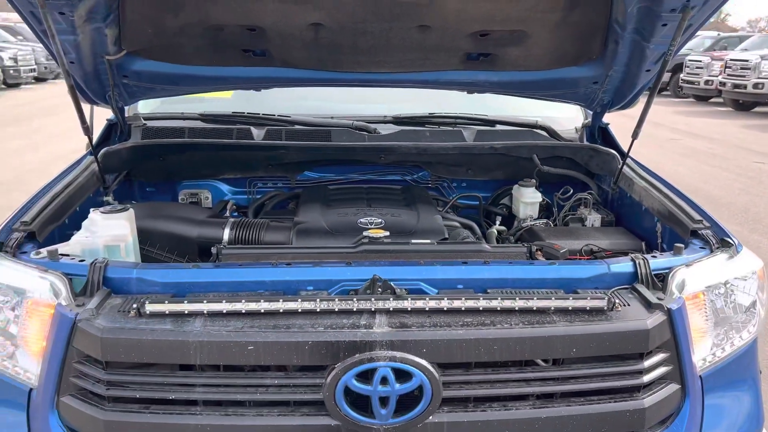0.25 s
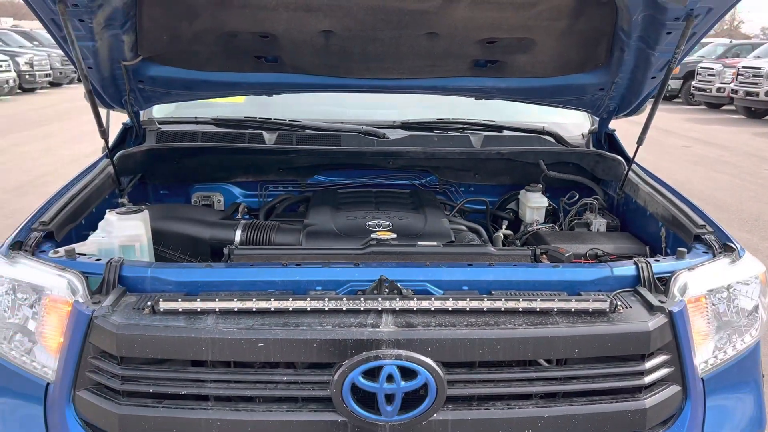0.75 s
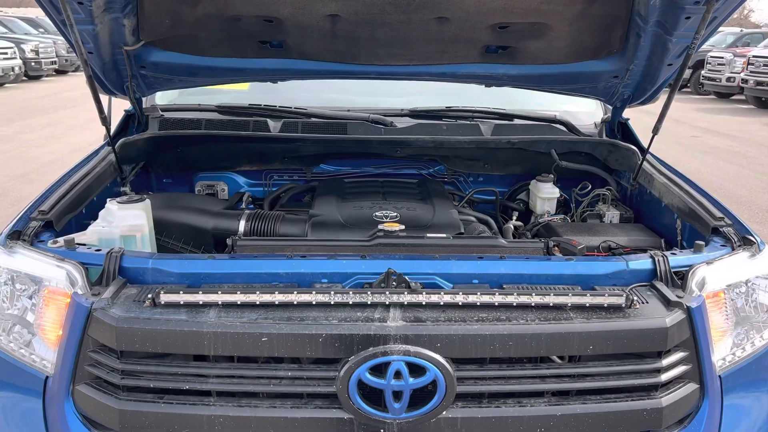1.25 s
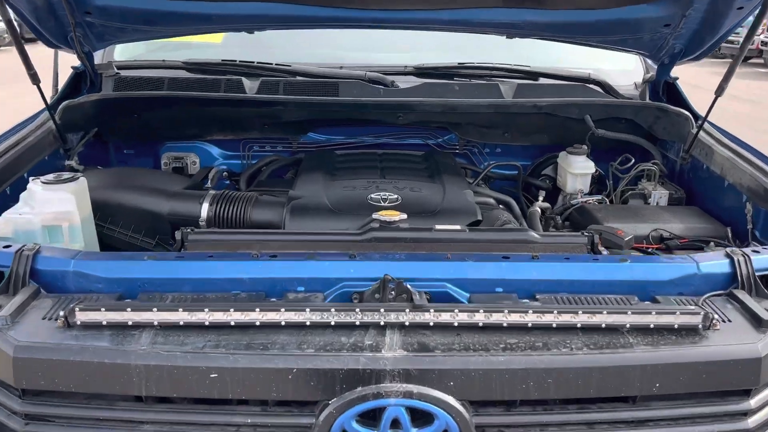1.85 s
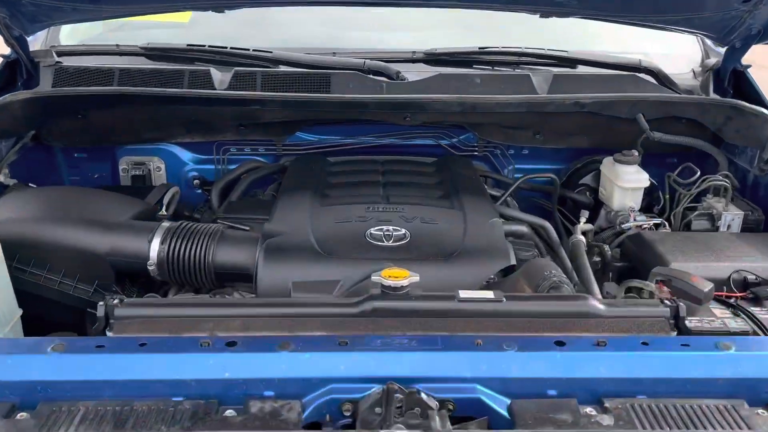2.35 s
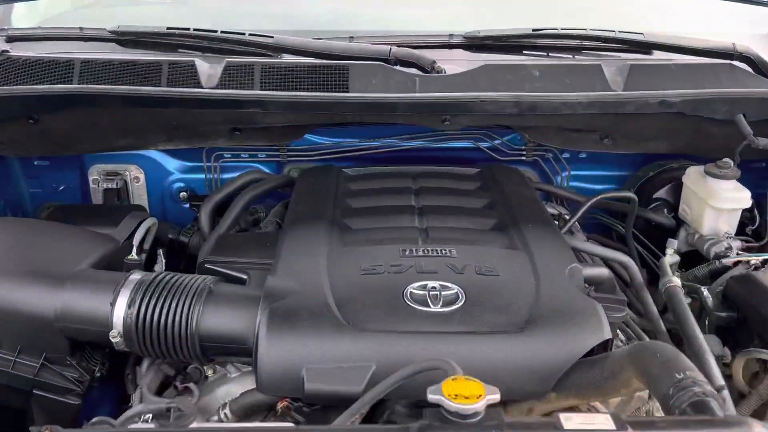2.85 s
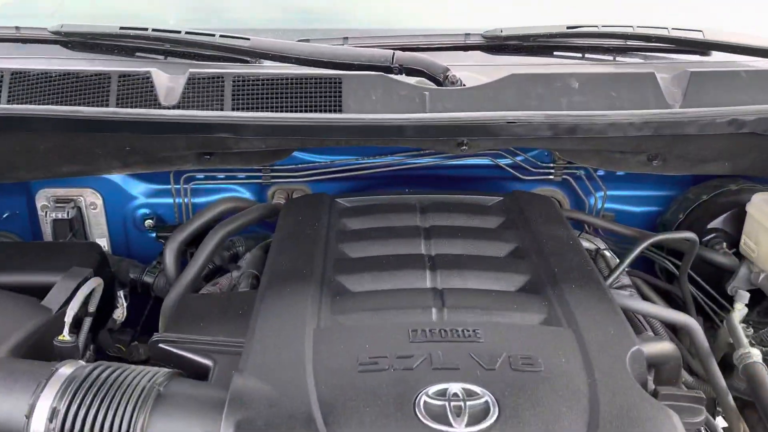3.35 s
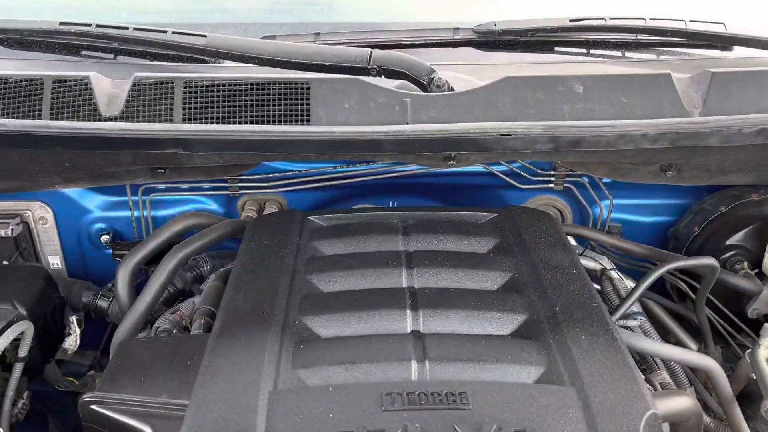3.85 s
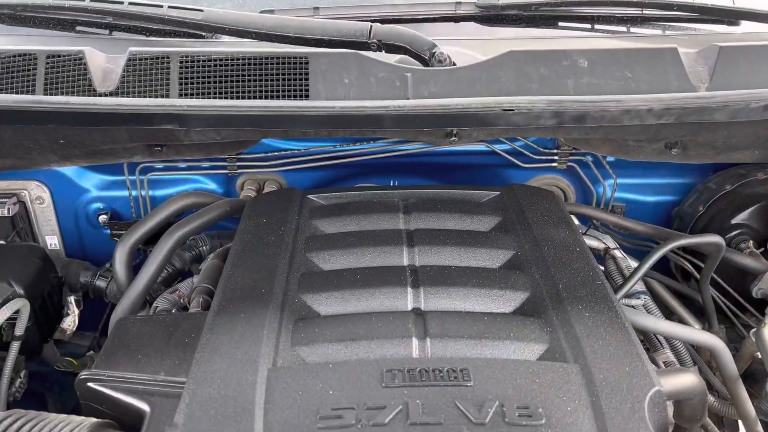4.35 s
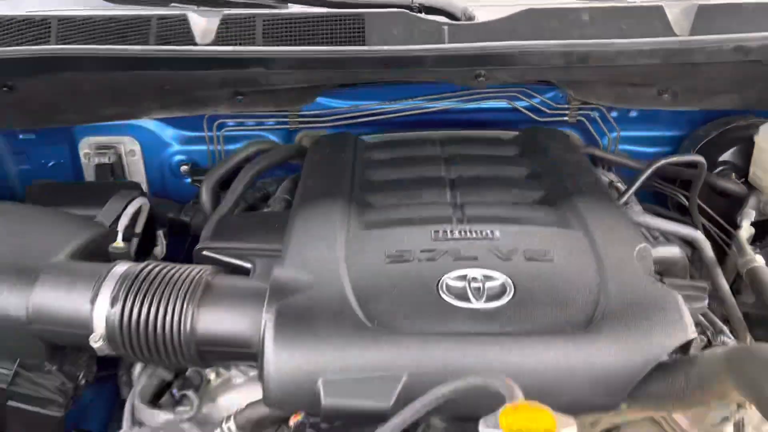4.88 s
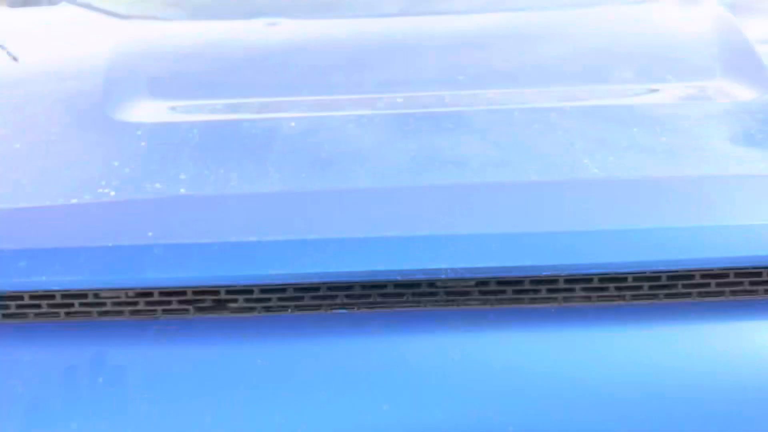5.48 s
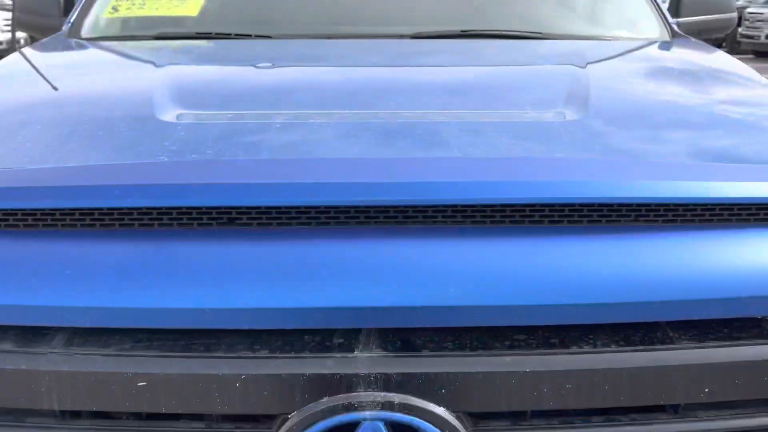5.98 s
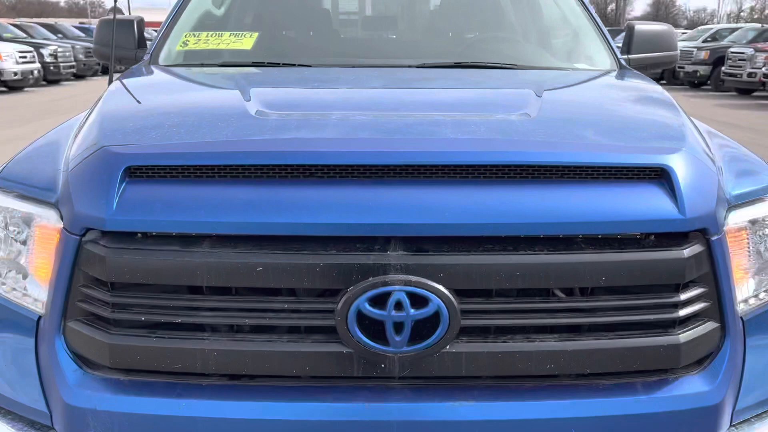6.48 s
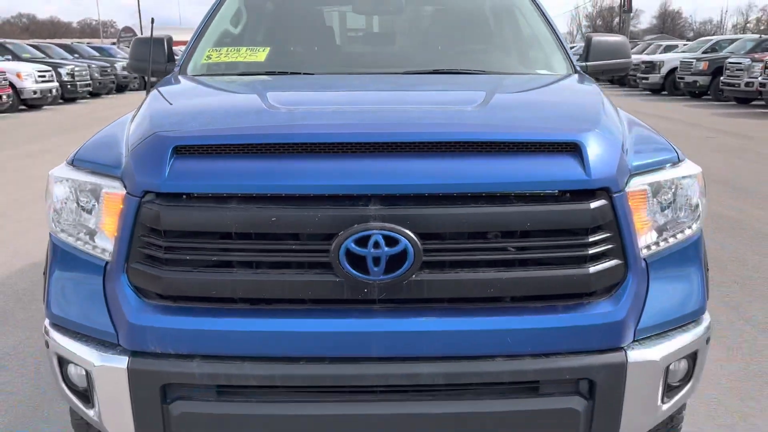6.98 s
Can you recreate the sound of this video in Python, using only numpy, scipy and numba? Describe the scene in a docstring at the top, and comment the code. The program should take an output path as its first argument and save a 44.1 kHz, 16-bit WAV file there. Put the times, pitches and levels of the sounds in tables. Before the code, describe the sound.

Outdoors, a pickup engine idles and hisses closer through thumping wind until its metal hood bangs down, leaving a duller roar and hard gusts.

```python
"""A pickup idles with its hood up on a windy outdoor lot; a hand-held stereo microphone moves in over the engine.
Engine: band-filtered noise roars, and valve hiss throbs at the firing rate. Wind: noise at three eddy sizes,
with short sagging pulses, buffets the ports throughout. After about five seconds the hood slams shut: noise and
decaying modes make its blows. The engine is then muffled, and the gain control ducks under the slam and
recovers; amid the last gusts a few ticks of cooling metal are short noise decays."""
import sys
import numpy as np
from scipy import signal
from scipy.fft import rfft, irfft, next_fast_len
from scipy.io import wavfile
from scipy.ndimage import uniform_filter1d
from numba import njit

SR = 44100
rng = np.random.default_rng(int(sys.argv[2]) if len(sys.argv) > 2 else 0)


def wrap_up_sound(samples):
    """Save the sound to the file named by the first command line argument, as 16-bit audio."""
    columns = np.atleast_2d(samples).T
    # keep every value between -1 and 1, then stretch to whole-number steps
    tamed = np.clip(columns, -1, 1)
    steps = np.round(tamed * 32767).astype(np.int16)
    wavfile.write(sys.argv[1], SR, steps)


N = 318666
LEFT_RIGHT = np.array([[1], [-1]])  # opposite signs for the two ports

# spectrum of the crack of struck metal: f/Hz, relative level/dB
CRACK_SPECTRUM = [(1500, 10.5), (3000, 5.5), (4500, 11), (6000, 4.5), (8500, 8), (10500, -4), (12500, 4),
                  (15500, -5), (16500, -21)]


def engine():
    """Amplitude modulation: airflow noise flutters band by band, valve noise throbs with the firing cycle."""
    # source levels, hood up then hood shut: t/s, fan and intake roar level/dB, valve gear hiss level/dB
    engine_levels = [
        [(0, -37.5, -50), (1, -36, -49.5), (1.8, -36, -48.5), (2.4, -37, -46), (2.9, -35, -43.5),
         (3.4, -35, -40.5), (4.2, -35, -40.5), (4.9, -34.5, -40.5), (5.05, -34.5, -41.5), (5.19, -37.5, -53.5)],
        [(5.3, -47.5, -60), (5.4, -41, -58), (5.5, -38, -58), (5.56, -35, -59), (5.62, -35.5, -58),
         (6.0, -33.5, -52.5), (6.35, -34.5, -53.5), (6.8, -35, -57), (7.226, -34.5, -56)],
    ]
    roar_db, valve_db = curve(engine_levels[0] + engine_levels[1])
    roar_gain = undb(roar_db + 0.13 * walk(5.8))
    return roar_gain * intake_roar() + valve_hiss(valve_db)


def intake_roar():
    """Broadband flow noise of fan and intake; shutting the hood alters its spectral envelope."""
    # roar with the hood up: f/Hz, relative level/dB
    open_spectrum = [(150, 8), (400, -8.5), (800, 3.5), (1050, 3.5), (1500, 2.5), (2000, 0), (2500, -4),
                     (2900, -6.5), (3200, -12), (4200, -17), (6000, -28)]
    # roar with the hood shut: f/Hz, relative level/dB
    shut_spectrum = [(150, 12.5), (400, 0), (800, 3), (1100, 2), (1500, -1.5), (2000, -1.5), (2400, 0),
                     (2750, -6.5), (3000, -13.5), (4200, -16), (5500, -22), (7000, -29)]
    shut = np.arange(N) / SR > 5.25
    muffled = ports(noise(shut_spectrum), noise(shut_spectrum), -0.21)
    exposed = ports(noise(open_spectrum), noise(open_spectrum), -0.72)
    roar = np.where(shut, muffled, exposed)
    # the air stream flutters on its own in each of eight bands, split by differences of low-passes
    cutoffs_hz = (700, 1000, 1350, 1750, 2200, 2650, 3200)
    lows = [signal.sosfilt(signal.butter(2, hz, fs=SR, output="sos"), roar) for hz in cutoffs_hz]
    bands = np.diff([0 * roar, *lows, roar], axis=0)
    fluttering = np.zeros((2, N))
    for band in bands:
        flutter_db = 2.85 * walk(70) + 2.5 * walk(30) + 1.7 * walk(14) + 0.74 * walk(6.3)
        fluttering += undb(flutter_db) * band
    return fluttering


def valve_hiss(valve_db):
    """Periodic amplitude modulation: hiss leaps at each firing of the eight cylinders and decays between."""
    # valve gear hiss: f/Hz, relative level/dB
    valve_spectrum = [(2500, 6), (3500, -0.5), (5000, 0.5), (6500, 1.5), (8500, -1.5), (10200, -7.5),
                      (12000, 0.5), (14000, -15.5), (15600, 2), (16100, -35)]
    firing_hz = 46.3  # mean rate
    cycles = np.cumsum(firing_hz * (1 + .004 * walk(3))) / SR
    throb_db = 5.5 * np.exp(-(cycles % 1) / .4) - 2.2
    throb_db = throb_db + 1.5 * walk(60) + 1.1 * walk(12)
    hiss = ports(noise(valve_spectrum), noise(valve_spectrum), -58.0)
    return undb(valve_db + throb_db + .7 * LEFT_RIGHT) * hiss


def slam():
    """Impact excitation: successive blows drive panel modes, steel latch modes and a faster-dying crack."""
    # blows of hood on latch and stops: t/s, level/dB, bass weight/dB, treble level re blow/dB,
    # nominal t60/s of the panel rattle (the crack's shorter decay is scaled from it), latch ring level re blow/dB
    blows = [(5.199, -26, -9, -11, 0.12, -16), (5.206, -14.5, -17, -18, 0.13, -14),
             (5.2124, -10.5, -19, -0.5, 0.057, 4.5), (5.2155, -13, -21, 1.5, 0.032, -4),
             (5.219, -24, -15, -9, 0.074, -12), (5.2257, -11.5, -12, -4.5, 0.12, -6),
             (5.2293, -14.5, -17, 3, 0.12, 3), (5.2364, -0.5, -6, -9, 0.09, -17),
             (5.2405, -7, -1, -7, 0.065, -13), (5.2482, -1, -5, -14, 0.11, -17),
             (5.257, -6, -12, -17, 0.1, -17), (5.266, -1, -3.5, -12, 0.14, -18),
             (5.275, -4, -5, -10, 0.08, -14), (5.283, -2.5, -4.5, -13, 0.14, -17),
             (5.292, 0.5, -5, -13, 0.15, -16), (5.298, 0.5, -4.5, -16, 0.16, -19),
             (5.308, -8, 1, -18, 0.099, -24), (5.325, -13, 3, -26, 0.12, -30),
             (5.343, -6.5, -0.5, -31, 0.14, -37), (5.376, -15, 0, -21, 0.08, -24),
             (5.43, -37, 5, -7, 0.015, -15)]
    t = np.arange(int(.3 * SR)) / SR
    out = np.zeros((2, N))
    for s, db, weight_db, treble_db, rattle_t60, latch_db in blows:
        boom = undb([[-1.2], [1.2]]) * panel(t, weight_db, rattle_t60)  # stronger on the right
        add(out, s, undb(db) * (boom + crack(t, treble_db, rattle_t60) + latch(t, latch_db)))
    return out


def panel(t, weight_db, rattle_t60):
    """Modal resonance: the panel rattles as noise under its response curve and rings in free decay."""
    # hood panel modes: f/Hz, bandwidth/Hz, relative level/dB
    hood_modes = [(70, 28, 7), (124, 32, 5), (266, 68, 13), (377, 37, 7), (472, 60, 5.5), (660, 62, 3.5),
                  (858, 25, -1.5), (1020, 75, 5), (1260, 110, -3.5), (1371, 54, -9), (1610, 32, -13),
                  (1866, 50, -11.5), (2240, 110, -8.5), (2660, 410, -12)]
    f = np.geomspace(40, 4000, 400)
    power, ring = np.zeros(len(f)), np.zeros(len(t))
    for hz, width_hz, mode_db in hood_modes:
        # only the full weight of the hood drives the modes under 550 Hz
        gain = undb(mode_db + weight_db * (hz < 550))
        power += gain ** 2 / (1 + (2 * (f - hz) / width_hz) ** 2)
        # modes start nearly in step so that the blow knocks; each dies at the rate its width sets
        phase = 2 * np.pi * (hz * t + 0.43 * rng.random())
        ring += gain * np.sin(phase) * np.exp(-np.pi * width_hz * t)
    response = list(zip(f, 10 * np.log10(power)))
    rattle = ports(noise(response, count=len(t)), noise(response, count=len(t)), -7.0)
    rattle = rattle * np.minimum(t / 0.0094, 1) * undb(-60 * t / max(rattle_t60, .01))
    return rattle + undb(-7.5) * ring * np.minimum(t / 0.00092, 1)


def crack(t, treble_db, rattle_t60):
    """Impulsive contact noise: the first contact stands out, then loose parts break the decay into knocks."""
    clatter_db, clatter_s = 1.5, 0.0017  # spread and spacing of the knocks
    strike_db, strike_s = 4, 0.0021  # boost of the first contact and its fade
    knocks_db = clatter_db * np.interp(t, np.arange(300) * clatter_s, rng.standard_normal(300)) - 3
    decay_db = -60 * t / max(0.71 * rattle_t60, .01)
    level_db = treble_db + knocks_db + strike_db * np.exp(-t / strike_s) + decay_db
    burst = ports(noise(CRACK_SPECTRUM, count=len(t)), noise(CRACK_SPECTRUM, count=len(t)), -3.5)
    return burst * np.minimum(t / 0.00037, 1) * undb(level_db)


def latch(t, latch_db):
    """Free vibration: the struck steel latch sounds a sum of exponentially decaying modes."""
    # steel latch modes: f/Hz, relative level/dB, t60/s
    latch_modes = [(1376, -10, 0.11), (1890, -6.5, 0.055), (2200, -4.5, 0.046), (2480, -3.5, .03),
                   (3800, -11, .06), (4160, -7.5, .03), (4840, -9.5, 0.056), (5710, -10, 0.076),
                   (6840, -8, 0.044), (8450, -12, 0.024)]
    ring = np.zeros(len(t))
    for hz, mode_db, ring_s in latch_modes:
        turn, size = rng.random(2)  # random phase and strength
        level_db = latch_db + mode_db + 3.9 * (size - 1.0) - 60 * t / ring_s
        ring += undb(level_db) * np.sin(2 * np.pi * (hz * t + turn))
    return ring * np.minimum(t / .0006, 1)


def cooling_ticks():
    """Thermal contraction: cooling metal under the shut hood gives brief, exponentially decaying noise."""
    # ticks: t/s, initial level/dB
    tick_times = [(5.885, -34), (5.957, -41), (7.156, -39)]
    t = np.arange(int(.3 * SR)) / SR
    out = np.zeros((2, N))
    for s, db in tick_times:
        burst = ports(noise(CRACK_SPECTRUM, count=len(t)), noise(CRACK_SPECTRUM, count=len(t)), 1)
        add(out, s, undb(db - 60 * t / 0.0071) * burst)
    return out


def wind():
    """Turbulent pressure fluctuation at the ports: continuous buffeting with single eddies on top."""
    out = buffeting() + eddies()
    return out + .03 * LEFT_RIGHT * out.mean(axis=0)  # the left port faces the wind


def buffeting():
    """Turbulence at three eddy sizes: the smaller ones come in quicker, deeper flurries."""
    # steady wind strength: t/s, rumble level/dB, thump level/dB, flutter level/dB
    wind_levels = [(0.0, -32.5, -36, -40), (0.32, -30.5, -36.5, -44.5), (0.65, -35.5, -39, -40.5),
                   (1.22, -26.5, -30.5, -36.5), (1.93, -35.5, -40.5, -43), (2.37, -31.5, -33, -37.5),
                   (2.63, -29, -33.5, -45), (3.05, -28, -35.5, -45), (3.14, -42, -52, -47),
                   (3.22, -27, -33, -39), (3.36, -30, -37, -42), (5.11, -28.5, -32, -39.5),
                   (5.18, -32, -35, -31), (5.42, -20.5, -23, -44), (5.5, -27.5, -32, -41),
                   (5.58, -25, -31.5, -42), (5.66, -29, -25, -26.5), (5.73, -26, -27, -30),
                   (5.8, -23, -25, -28), (5.88, -24, -24.5, -30), (5.96, -24, -30, -28),
                   (6.09, -24, -20.5, -29), (6.2, -20.5, -23.5, -33), (6.29, -28, -37, -44),
                   (6.56, -31, -32, -46), (6.88, -31, -39, -45), (7.22, -31, -45, -42.5)]
    # flurries of small eddies: start t/s, length/s, thump level/dB, flutter level/dB
    flurry_bursts = [(0.032, 0.22, -28, -46), (0.371, 0.048, -25.5, -55), (0.492, 0.07, -28, -49),
                     (0.76, 0.12, -29, -44), (0.915, 0.05, -28, -51), (1.008, 0.2, -28, -32.5),
                     (1.23, 0.048, -28.5, -49), (1.33, 0.06, -28, -31), (1.416, 0.03, -24.5, -38),
                     (1.525, 0.048, -29, -32), (2.49, 0.064, -35, -51), (2.678, 0.031, -29, -45),
                     (2.819, 0.021, -21, -49), (3.214, 0.14, -27.5, -46), (3.398, 0.12, -26.5, -35.5),
                     (3.567, 0.042, -26, -48), (3.62, 0.038, -24, -49), (3.792, 0.065, -28, -30),
                     (3.859, 0.052, -26.5, -31.5), (4.026, 0.03, -27.5, -40), (4.087, 0.062, -24, -30.5),
                     (4.235, 0.051, -31, -29), (4.344, 0.029, -23, -29), (4.394, 0.056, -21.5, -32),
                     (4.473, 0.026, -27, -33), (4.513, 0.026, -21.5, -22.5), (4.58, 0.076, -31, -31),
                     (4.708, 0.17, -36, -40), (4.883, 0.058, -34, -49), (5.041, 0.055, -20, -39),
                     (5.121, 0.099, -32, -38), (5.61, 0.032, -14, -34), (5.683, 0.039, -11, -25),
                     (5.74, 0.025, -19, -24.5), (5.78, 0.04, -22.5, -21), (5.842, 0.014, -21, -29),
                     (5.92, 0.037, -21, -24), (5.974, 0.024, -21, -24), (6.006, 0.045, -23, -26),
                     (6.108, 0.028, -16.5, -27), (6.188, 0.057, -31, -27), (6.246, .018, -14, -19),
                     (6.305, 0.033, -21.5, -46), (6.406, 0.029, -26, -35), (6.507, 0.13, -35, -32),
                     (6.802, 0.082, -32, -33.5), (6.946, 0.022, -33, -22.5), (7.09, 0.048, -28.5, -41)]
    # swells of the largest eddies: start t/s, length/s, rumble level/dB
    swell_bursts = [(0.081, 0.058, -23.5), (0.227, 0.032, -18.5), (0.278, 0.052, -24),
                    (0.456, 0.024, -21.5), (0.58, 0.028, -24.5), (0.742, 0.075, -22), (1.002, 0.071, -20),
                    (1.056, 0.048, -20.5), (1.126, 0.083, -20.5), (1.35, 0.065, -23), (1.411, 0.046, -23),
                    (1.533, 0.058, -28), (1.865, 0.026, -25.5), (2.34, 0.024, -34), (2.47, 0.1, -26),
                    (2.592, .035, -18.5), (2.652, .03, -23), (2.823, 0.043, -21), (3.054, 0.026, -27),
                    (3.213, 0.048, -21.5), (3.4, 0.037, -19), (3.804, 0.047, -28), (3.91, 0.04, -19.5),
                    (4.018, 0.09, -20), (4.192, 0.039, -22.5), (4.255, .04, -20.5), (4.326, 0.048, -26),
                    (4.44, 0.039, -34), (4.631, 0.035, -20), (4.731, 0.03, -16), (4.849, 0.026, -13.5),
                    (5.036, 0.047, -12), (5.172, 0.035, -23), (5.593, 0.095, -18.5), (5.718, 0.044, -23),
                    (5.79, 0.033, -18), (5.847, 0.1, -23), (5.987, 0.031, -18), (6.072, .04, -20),
                    (6.188, .035, -22.5), (6.253, 0.027, -20), (6.395, 0.051, -23), (6.503, 0.038, -26),
                    (6.616, 0.043, -19), (7.011, 0.032, -19.5), (7.106, 0.032, -22)]
    swell_edge_s, flurry_edge_s = 0.0093, 0.0091  # half of each rise and fall
    rumble_db, thump_db, flutter_db = curve(wind_levels)
    rumble_db = bursts(rumble_db, swell_bursts, swell_edge_s)
    thump_db = bursts(thump_db, [row[:3] for row in flurry_bursts], flurry_edge_s)
    flutter_rows = [(s, length, db) for s, length, _, db in flurry_bursts]
    flutter_db = bursts(flutter_db, flutter_rows, flurry_edge_s)
    flurry = walk(35)  # shared by all sizes
    # per size: spectrum (f/Hz, level/dB), level/dB, level of the opposed part/dB, levelling span/s
    sizes = [
        ([(38, 7.6), (60, 17.6), (100, 14.4), (140, 9.4)],
         rumble_db + 2.74 * walk(11) + 1.3 * flurry, -10.5, .025),
        ([(150, 11.05), (250, 9.5), (400, 2.6)],
         thump_db + 2.36 * walk(25) + 2.2 * flurry, -14, .01),
        ([(400, 3.0), (600, 1.5), (900, -10.0), (1400, -22.5)],
         flutter_db + 5.45 * walk(60) + 1.9 * flurry, -4, .005)]
    out = np.zeros((2, N))
    for spectrum, db, side_db, span_s in sizes:
        out += undb(db) * ports(even(noise(spectrum), span_s), noise(spectrum), side_db)
    return out * undb(LEFT_RIGHT * 0.9 * walk(29))  # the buffeting swings from port to port


def eddies():
    """Transient pressure pulses: each sags in pitch as its eddy passes and has a ragged leading edge."""
    # single eddies bursting on the ports: arrival t/s, nominal pulse level/dB, nominal f/Hz,
    # nominal level of the ragged edge/dB
    eddy_arrivals = [(0.036, -19, 301, -19.5), (0.095, -7, 221, -16.5), (0.369, -19, 226, -28),
                     (0.768, -18, 292, -24.5), (0.814, -17, 288, -35), (1.022, -13.5, 323, -25),
                     (1.09, -22, 300, -35), (1.125, -20, 350, -27), (1.164, -17, 433, -29),
                     (1.338, -13.5, 256, -27), (1.538, -22, 305, -25), (2.528, -13.5, 263, -28),
                     (2.54, -14, 260, -32), (2.593, -17, 332, -22), (2.612, -20, 251, -29),
                     (2.692, -22, 298, -37), (2.805, -19, 520, -35), (2.826, -18, 412, -41),
                     (2.834, -17, 480, -31), (2.885, -11, 380, -17.5), (2.972, -23, 575, -28),
                     (3.302, -14, 222, -29), (3.332, -21, 226, -21.5), (3.396, -20, 234, -23),
                     (3.44, -15, 330, -18), (3.476, -16, 330, -33), (3.624, -11, 223, -35),
                     (3.721, -16.5, 394, -31), (3.791, -22, 330, -19.5), (3.868, -18.5, 317, -32),
                     (4.037, -13.5, 220, -36), (4.091, -9.5, 300, -17.5), (4.1, -16, 396, -20),
                     (4.118, -10.5, 367, -17.5), (4.134, -24, 397, -22), (4.241, -15.5, 396, -20),
                     (4.255, -19, 395, -23), (4.27, -19, 300, -28), (4.348, -14.5, 450, -27),
                     (4.409, -21, 345, -24), (4.424, -16, 463, -26), (4.441, -18, 298, -21),
                     (4.478, -16, 347, -23), (4.511, -20, 220, -17), (4.534, -22, 330, -24),
                     (4.709, -16.5, 350, -22), (4.748, -20, 322, -18.5), (4.808, -14, 260, -35),
                     (4.919, -12.5, 392, -36), (5.044, -7.5, 235, -34), (5.065, -19, 258, -33),
                     (5.084, -13, 300, -32), (5.127, -13, 260, -35), (5.183, -5.5, 227, -19),
                     (5.434, -15, 220, -33), (5.487, -18, 260, -30), (5.543, -9.5, 260, -31),
                     (5.556, -20, 300, -30), (5.605, -11, 278, -22), (5.63, -6.5, 260, -27),
                     (5.686, -8, 300, -18), (5.745, -11, 590, -15), (5.767, -8, 435, -16),
                     (5.787, -9.5, 520, -21), (5.81, -18, 450, -22), (5.823, -12, 480, -29),
                     (5.842, -10, 377, -30), (5.877, -16, 524, -31), (5.917, -8, 350, -22),
                     (5.952, -11, 573, -24), (5.982, -11.5, 430, -16), (5.991, -15, 477, -23),
                     (6.014, -17, 392, -7), (6.021, -13, 535, -10), (6.027, -9, 423, -14),
                     (6.046, -6, 520, -6), (6.072, -22, 450, -16), (6.12, -14, 300, -21),
                     (6.187, -15, 546, -24), (6.218, -14, 530, -18), (6.247, -10, 350, -17),
                     (6.309, -18, 288, -27), (6.411, -16, 221, -28), (6.521, -18.5, 455, -22),
                     (6.605, -12, 220, -21), (6.95, -16, 317, -20.5)]
    build_s, fade_s = 0.00204, 0.0068  # delay from arrival to burst, decay of the pulse
    start, end, sag_s = 1.502, 0.403, 0.0046  # pitch falls between these multiples, at this pace
    snap_db, snap_hz, snap_s = 3, 693, 0.0015  # opening snap: gain before halving, pitch, fade
    edge_spectrum = [(450, 8.5), (800, -6.0), (1200, -8.5), (2000, -15.0), (2800, -33)]
    t = np.arange(int(.08 * SR)) / SR
    sagging_t = end * t + (start - end) * sag_s * (1 - np.exp(-t / sag_s))
    pulse_envelope = np.minimum(t / 0.001, 1) * np.exp(-t / fade_s)
    edge_envelope = np.minimum(t / 0.0012, 1) * np.exp(-t / 0.0051)
    snap_envelope = t / snap_s * np.exp(1 - t / snap_s) / 2
    snap = undb(snap_db) * np.sin(2 * np.pi * snap_hz * t) * snap_envelope
    out = np.zeros((2, N))
    for s, peak_db, hz, edge_db in eddy_arrivals:
        sign = np.sign(rng.random() - .5)
        pulse = sign * np.sin(2 * np.pi * hz * sagging_t) * pulse_envelope
        edge = noise(edge_spectrum, count=len(t)) * edge_envelope + sign * snap
        lean = undb(LEFT_RIGHT * 1.1 * (rng.random() + 0.55))  # stronger on the left
        add(out, s + build_s, (undb(peak_db) * pulse + undb(edge_db) * edge) * lean)
    return out


def undb(db):
    """Decibel law: amplitude gain of a level in dB."""
    return 10 ** (np.asarray(db) / 20)


def curve(rows):
    """Linear interpolation: columns of a time table, one value a sample."""
    s, *columns = np.transpose(rows)
    return [np.interp(np.arange(N) / SR, s, c) for c in columns]


def noise(points, count=N):
    """Spectral shaping: noise of rms 1 from (f/Hz, level/dB) points, falling steeply beyond the ends."""
    (lo, lo_db), (hi, hi_db) = points[0], points[-1]
    hz, db = np.transpose([(lo / 16, lo_db - 80), *points, (hi * 16, hi_db - 100)])
    size = next_fast_len(count)
    f = np.maximum(np.arange(size // 2 + 1) * SR / size, 1)
    gain = undb(np.interp(np.log(f), np.log(hz), db))
    x = irfft(rfft(rng.standard_normal(size)) * gain, size)[:count]
    return x / x.std()


def walk(rate):
    """Slow random modulation: levels held 1 / rate s and smoothed twice; spread near 0.5."""
    k = int(SR / rate)
    steps = np.repeat(rng.standard_normal(N // k + 1), k)
    return 0.71 * uniform_filter1d(uniform_filter1d(steps, k), k)[:N]


def ports(common, apart, side_db):
    """Sum-and-difference stereo: a shared part and a part of opposite sign at left and right."""
    return common + undb(side_db) * apart * LEFT_RIGHT


def add(out, s, x):
    """Superposition: mix x into out from s seconds on."""
    i = int(s * SR)
    out[..., i:i + x.shape[-1]] += x[..., :N - i]


def bursts(steady_db, rows, edge_s):
    """Power addition: bursts (start, length, dB) that rise, hold and fall join a steady level in dB."""
    t, power = np.arange(N) / SR, undb(steady_db) ** 2
    for s, length, db in rows:
        begin, end = s - edge_s, s + length + edge_s
        i, j = max(int(begin * SR), 0), int(end * SR)
        nearest_end = np.minimum(t[i:j] - begin, end - t[i:j])
        ramp = np.clip(nearest_end / (2 * edge_s), 0, 1)
        power[i:j] += (undb(db) * ramp ** 2) ** 2
    return 10 * np.log10(power)


def even(x, span_s):
    """Envelope compression: chance swells of noise over span_s are partly levelled out."""
    evenness = 0.19  # 0 = plain noise, 1 = full division by the local rms
    x = x / uniform_filter1d(x ** 2, int(span_s * SR)) ** (evenness / 2)
    return x / x.std()


@njit
def follow(x, attack, release):
    """First-order smoothing with separate rates (per sample) for rise and fall."""
    e, y = 1e-6, np.empty(len(x))
    for i in range(len(x)):
        e += (x[i] - e) * (attack if x[i] > e else release)
        y[i] = e
    return y


def scene():
    """Superposition at two ports, whose paths turn the phase apart, most of all in the treble."""
    # phase lead of the left port over the right: f/Hz, lead/rad
    port_phase = [(0, 0), (900, 0.84), (2500, 0.45), (7400, 1.52), (8700, -1), (15800, -10.5),
                  (22050, -23.6)]
    hz, lead = np.transpose(port_phase)
    size = next_fast_len(N + 512)
    f = np.arange(size // 2 + 1) * SR / size
    turn = np.interp(f, hz, lead) * .5 * LEFT_RIGHT
    mix = engine() + slam() + cooling_ticks() + wind()
    return irfft(rfft(mix, size) * np.exp(1j * turn), size)[:, :N]


def record(dry):
    """Dynamic range compression: a quick limiter holds peaks; a sluggish gain control lags and recovers."""
    top_hz = 16600  # upper band limit
    dry = signal.sosfilt(signal.butter(2, 35, "high", fs=SR, output="sos"), dry)
    peak = follow(np.abs(dry).max(axis=0), 1 / (0.0018 * SR), 1 / (0.044 * SR))
    lagging = follow(peak, 1 / (.07 * SR), 1 / (.07 * SR))
    loudness = follow(lagging, 1 / (.07 * SR), 1 / (.06 * SR))
    limiter_gain = np.minimum(undb(-7.5) / peak, 1) ** 0.85
    slow_gain = np.minimum(undb(-11.5) / loudness, 1) ** 1.03
    saturated = np.tanh(dry * limiter_gain * slow_gain)
    return signal.sosfilt(signal.ellip(10, .2, 80, top_hz, fs=SR, output="sos"), saturated)


dry = scene()
out = record(dry)
wrap_up_sound(out)
```